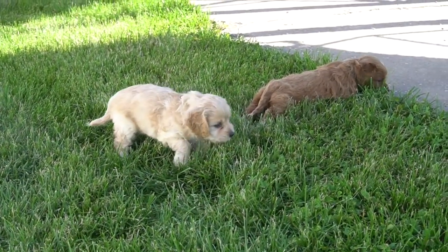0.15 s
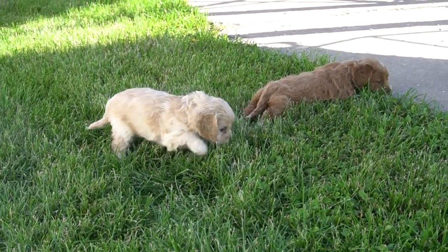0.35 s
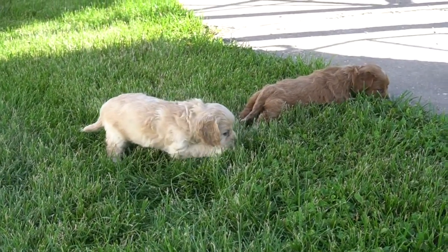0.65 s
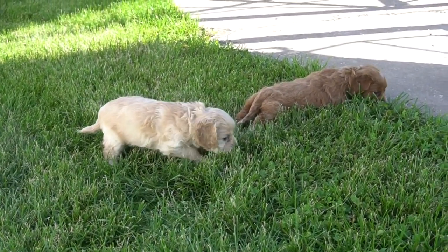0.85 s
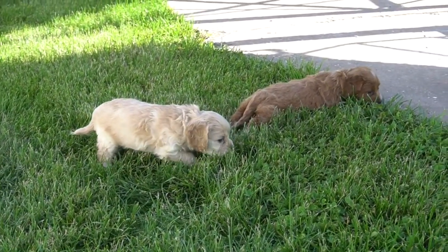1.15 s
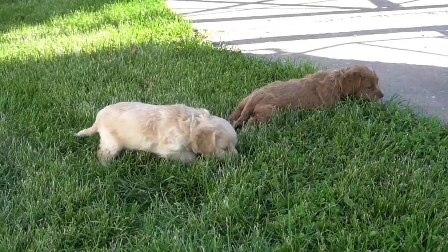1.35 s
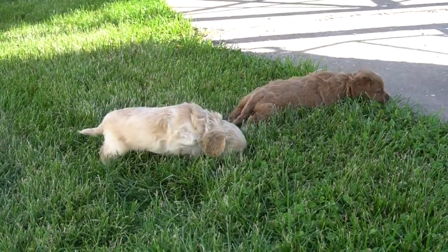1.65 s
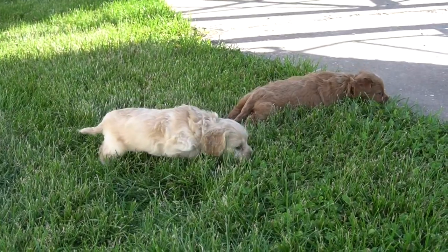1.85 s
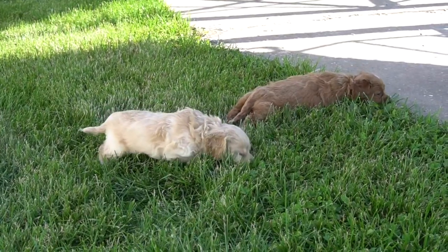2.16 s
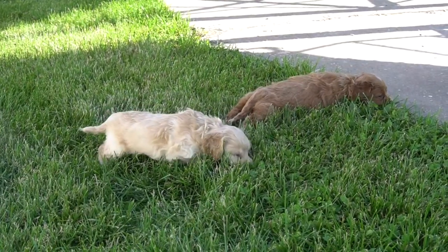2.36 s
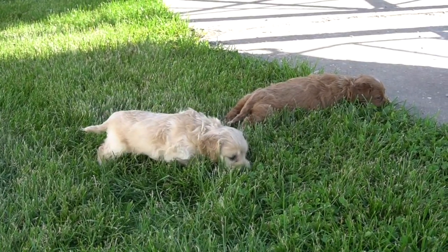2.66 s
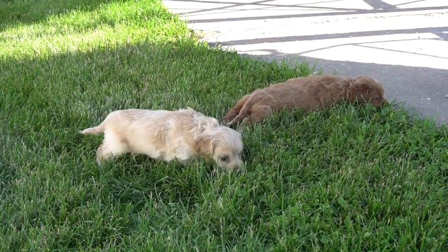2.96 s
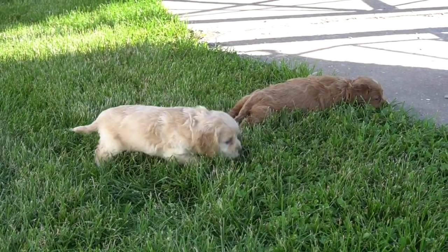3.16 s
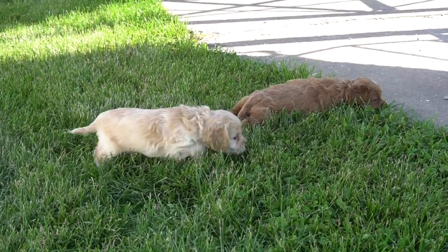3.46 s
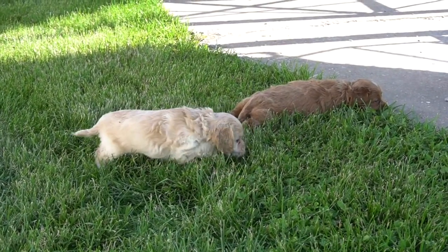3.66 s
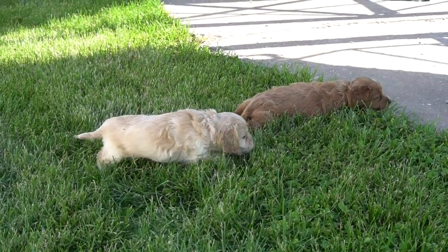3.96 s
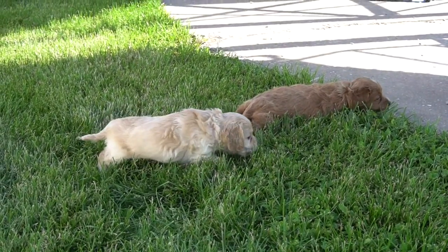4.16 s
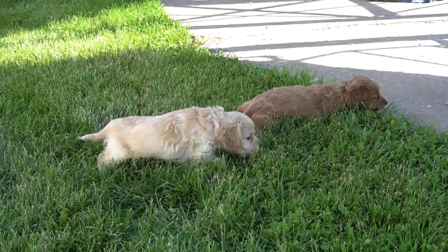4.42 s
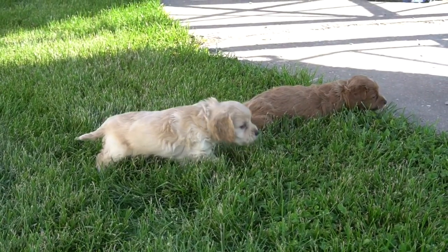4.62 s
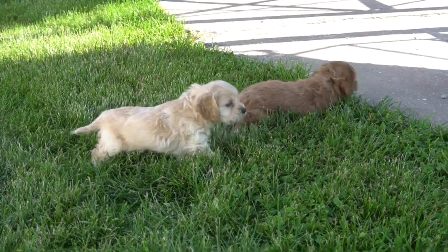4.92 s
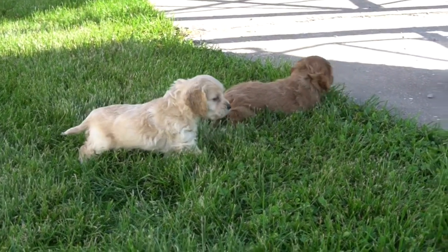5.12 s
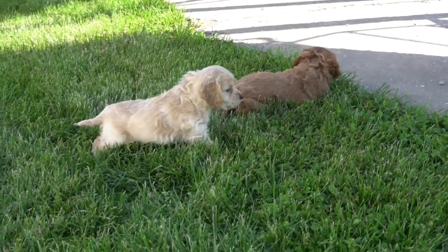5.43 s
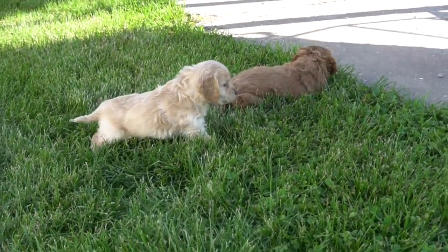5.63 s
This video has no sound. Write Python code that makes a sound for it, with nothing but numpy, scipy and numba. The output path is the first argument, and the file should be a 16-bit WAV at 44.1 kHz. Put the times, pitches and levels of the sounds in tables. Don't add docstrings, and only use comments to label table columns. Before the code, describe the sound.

A breezy garden lawn in stereo, about six seconds. Low wind buffets hit the microphone at once, ease around 0.5 s, then return as heavy, fluttering thumps from 1.2 to 3 s; afterwards it is calm but for a small puff at 5.6 s. A sparrow at left gives quick three-note chirrups at 0.23, 3.27 and 4.8 s: a raspy upward flick, then two arched, falling notes, the last loudest, with tight reflections and a wall echo. A high bird slides downward around 0.5 s. From 1 s nestlings beg in hoarse, slightly sagging high calls of a quarter second or so, frequent until 3.7 s, then sparser, with a long one at 5.4 s. Thin whistles and a hazy chorus come from further off. Small dry stalks snap at 0.9, 1.4 and 5.3 s. Faint traffic and a low hum continue throughout.

```python
import sys
import numpy as np
from scipy import signal
from scipy.io import wavfile
from scipy.ndimage import uniform_filter1d
from numba import njit

SR = 44100
rng = np.random.default_rng(int(sys.argv[2]) if len(sys.argv) > 2 else 0)


def natural_amplitude(level_db):
    exponent = np.asarray(level_db, float) / 20
    return 10 ** exponent


def log_audio(samples):
    frames = np.atleast_2d(samples).T
    limited = np.clip(frames, -1, 1)
    pcm = np.round(limited * 32767).astype(np.int16)
    wavfile.write(sys.argv[1], SR, pcm)


N = 255206
T = np.arange(N) / SR


def level(x, db):
    return x * natural_amplitude(db) / np.sqrt(np.mean(x ** 2))


def band(x, lo_hz, hi_hz):
    sos = signal.butter(2, [lo_hz, min(hi_hz, 0.45 * SR)], "bandpass", fs=SR, output="sos")
    return signal.sosfilt(sos, x)


def walk(rate, size=N):
    hold = max(int(SR / rate), 1)
    held = rng.standard_normal(256)[np.arange(size) // hold % 256]
    return 1.5 * uniform_filter1d(uniform_filter1d(held, hold), hold)


def add(out, s, x):
    i = int(s * SR)
    out[..., i:i + x.shape[-1]] += x[..., :N - i]


def sides(pan_db):
    return natural_amplitude(np.array([pan_db, -pan_db]) / 2)


def syrinx(hz, partials_db):
    phase = 2 * np.pi * np.cumsum(hz) / SR
    voice = 0
    for k, db in enumerate(partials_db, 1):
        voice = voice + natural_amplitude(db) * np.sin(k * phase) * (k * hz < 0.4 * SR)
    return voice


def garden(x, t60, left_db, right_db):
    t = T[:SR]
    haze = rng.standard_normal((2, SR)) * 1000 ** (-t / t60) * np.minimum(t / 0.0081, 1)
    haze /= np.sqrt(np.sum(haze ** 2, axis=1, keepdims=True))
    wet = signal.fftconvolve(np.atleast_2d(x) * np.ones((2, 1)), haze, axes=1)[:, :N]
    return natural_amplitude(np.array([[left_db], [right_db]])) * wet


# pitch_hz [Hz], level_db [dB per Hz]
TOWN_SPECTRUM = [(25, 1), (59, -2), (140, -4.5), (193, -8.5), (247, -2.5), (390, -12), (450, -12),
                 (650, -16.5), (1200, -18), (2240, -21.5), (4600, -20.5), (6600, -35.5), (12200, -37),
                 (15600, -41.5)]
# pitch_hz [Hz], left-right likeness [0-1]
COHERENCE = [(60, 1), (130, 1), (290, 1), (640, 0.78), (1410, 0.44), (3100, 0.59), (6820, 0.34),
             (15000, 0.2)]
# start_s [s], level_db [dB around 1 kHz]
TRAFFIC_SWELL = [(0.0, -51.5), (0.39, -55), (1.31, -51.5), (1.47, -56.5), (2.13, -56.5), (2.43, -52),
                 (3.47, -54), (4.04, -52.5), (4.58, -51.5), (5.0, -54), (5.79, -50.5)]
# pitch_hz [Hz], width_hz [Hz], level_db [dB]
HUM_BANDS = [(145, 15.6, -47), (235.7, 15.3, -55.5)]


def town():
    start_s, traffic_db = np.transpose(TRAFFIC_SWELL)
    swell_db = np.interp(T, start_s, traffic_db - np.mean(traffic_db))
    town_hz, town_db = np.transpose(TOWN_SPECTRUM)
    like_hz, likeness = np.transpose(COHERENCE)
    out = 0
    for hz in 25 * 2 ** np.arange(0, 9.4, 1 / 3):
        like = np.interp(np.log(hz), np.log(like_hz), likeness)
        mid, side = band(rng.standard_normal((2, N)), hz / 1.152, hz * 1.105)
        db = np.interp(np.log(hz), np.log(town_hz), town_db)
        db = db + swell_db * min(hz / 500, 1) + 2.3 * walk(5.5)
        pair = np.sqrt(1 + like) * mid + np.sqrt(1 - like) * side * np.array([[1], [-1]])
        out = out + natural_amplitude(db) * pair
    hum = np.zeros(N)
    for hz, width_hz, db in HUM_BANDS:
        hum += level(band(rng.standard_normal(N), hz - width_hz / 2, hz + width_hz / 2), db)
    return level(out, -42) + hum


# [dB, upper minus lower eddies]
GUST_PEAKS = [(0.0, -31.5, 1.4, -14.5), (0.089, -12.5, 0.05, -9.5), (0.238, -15.5, .16, -9),
              (0.45, -28, -0.5, -31), (0.55, -34, 0.5, -24), (0.70, -27.5, 0.4, -17.5),
              (0.80, -28.5, -1, -25), (0.98, -27.5, 0.4, -12), (1.18, -14.5, 0.03, -4),
              (1.451, -13.5, 0.28, -5), (1.509, -12, 0.02, -21), (1.618, -15.5, .08, -2.5),
              (1.683, -12, 0.0477, -0.5), (1.741, -23.5, -0.63, -8), (1.893, -14.5, 0.19, -8.5),
              (2.031, -18, 0.22, -6), (2.242, -15, 0.22, -14.5), (2.31, -18, 0.13, -20),
              (2.379, -21.5, 0.44, -7), (2.48, -20, 0.39, -27), (2.849, -21.5, 0.24, -8),
              (2.908, -18.5, 0.2134, -5.5), (4.054, -29, 0.11, -32), (4.51, -34, 0.15, -30),
              (5.598, -22.5, 0.26, -16), (5.78, -32, 1.1, -28)]


def gust_strengths():
    peak_s, peak_db, dying_s, sharp_db = np.transpose(GUST_PEAKS)
    rise_share, lull_db = 0.8, -62
    core_share = 0.36
    t = T[::100, None]
    lower = (peak_db, dying_s)
    upper = (peak_db + sharp_db + 4.0, core_share * dying_s)
    strengths = []
    for top_db, fall_s in (lower, upper):
        drop = np.maximum((t - peak_s) / fall_s, (peak_s - t) / (rise_share * fall_s))
        db = np.maximum((top_db - 20 * drop).max(axis=1), lull_db)
        strengths.append(natural_amplitude(np.interp(T, t[:, 0], db)))
    return strengths


def eddy(hz, turns):
    u = np.linspace(0, 1, int(turns * SR / hz))
    return np.sin(np.pi * u ** 0.55) ** 2 * np.sin(2 * np.pi * turns * u ** 0.86)


# pitch_hz [Hz], level_db [dB]
EDDY_SIZES = [(40, -10.5), (60, -2.5), (90, 1.5), (130, -2.5), (200, 5.5), (290, 0.5), (420, -11),
              (600, -21.5), (850, -40)]
# start_s [s], level_db [dB peak], pitch_hz [Hz]
SINGLE_EDDIES = [(0.068, -18, 150), (0.2, -23, 126), (0.215, -12.5, 122), (0.421, -44, 132),
                 (0.869, -27.5, 197), (0.975, -25, 130), (1.168, -18, 143), (1.385, -34, 145.8),
                 (1.426, -17, 138), (1.463, -12, 330), (1.558, -25, 133), (1.602, -12.5, 128),
                 (1.677, -18.5, 230), (1.715, -11, 155), (1.873, -21, 119.5), (1.906, -15.5, 118.4),
                 (1.984, -19, 186.7), (2.228, -32, 120), (2.258, -41, 121), (2.297, -19, 121),
                 (2.344, -33, 129), (2.367, -27, 145), (2.476, -37, 121), (2.826, -30, 125.4),
                 (2.848, -23, 120), (2.877, -10.5, 203), (2.915, -14.5, 154), (5.568, -23.5, 123)]


def wind():
    lower, upper = gust_strengths()
    out = np.zeros((3, N))
    for hz, db in EDDY_SIZES:
        arrive = rng.random((3, N)) < 0.8 * hz / SR
        size = rng.standard_normal((3, N)) * arrive
        swirls = signal.fftconvolve(size, eddy(hz, turns=2.84)[None], axes=1)[:, :N]
        out += level(swirls, db - 6.5) * (upper if hz > 170 else lower)
    for s, db, hz in SINGLE_EDDIES:
        add(out[0], s - 0.003, natural_amplitude(db + 4.5) * eddy(hz, turns=1.34))
    shared, own = out[0], out[1:]
    port_hz = 268
    turn = (1 - np.pi * port_hz / SR) / (1 + np.pi * port_hz / SR)
    right = signal.lfilter([-turn, 1], [1, -turn], shared)
    return np.array([shared, right]) + natural_amplitude(-8.5) * own


# start_s [s], level_db [dB]
CHORUS_SWELL = [(0.0, -49), (0.35, -45), (0.95, -65), (1.16, -50.5), (1.87, -57), (2.3, -53.5),
                (2.77, -51.5), (2.98, -84), (3.29, -59), (3.43, -37), (3.72, -65.5), (4.06, -48.5),
                (4.42, -60), (4.978, -40), (5.14, -57), (5.79, -50.5)]


def chorus():
    out = np.zeros((2, N))
    for when, low, slide, size, pan, long in rng.random((500, 6)):
        u = np.linspace(0, 1, int((0.0415 + 0.12 * long) * SR))
        bend = 0.35 * (slide - 0.7) * u + 0.0267 * walk(200.3, size=len(u))
        hz = (2500 + 3000 * low) * (1 + bend)
        call = np.sin(np.pi * u) * syrinx(hz, [0, -22])
        add(out, when * T[-1], natural_amplitude(10 * size) * sides(12 * (pan - 0.5))[:, None] * call)
    start_s, db = np.transpose(CHORUS_SWELL)
    return level(garden(out, 0.33, -0.6, -0.6), 5.9) * natural_amplitude(np.interp(T, start_s, db))


# start_s [s], length_s [s], end_hz [Hz], level_db [dB]
HIGH_SLIDES = [
    (0.49, 0.17, 5340, -39),
    (0.531, 0.18, 5220, -43),
    (.575, 0.19, 5130, -46.5),
    (0.651, 0.13, 6050, -47),
]
# start_s [s], length_s [s], start_hz [Hz], end_hz [Hz], level_db [dB]
HEDGE_WHISTLES = [(0.503, 0.12, 2177, 2170, -55), (.55, 0.067, 4210, 4460, -47),
                  (.62, 0.083, 3790, 3430, -48.5), (0.711, 0.082, 2634, 2190, -48),
                  (0.923, 0.045, 2220, 2580, -48), (0.961, 0.098, 3115, 2780, -42),
                  (1.271, 0.054, 3140, 3120, -48.5), (1.403, 0.038, 3220, 2950, -44),
                  (2.589, 0.056, 3330, 2890, -39), (2.804, 0.1, 3558, 2896, -44),
                  (3.786, 0.23, 3375, 3180, -50), (4.049, 0.07, 3220, 2920, -39.5),
                  (4.182, 0.11, 3640, 2910, -45.5), (4.52, 0.2, 2550, 2383, -53),
                  (5.056, 0.075, 3350, 3300, -53), (5.332, 0.055, 3140, 3070, -46)]
# start_s [s], length_s [s], start_hz [Hz], end_hz [Hz], level_db [dB]
TREE_WHISTLES = [(.92, 0.061, 4040, 4100, -45), (1.146, 0.036, 3880, 2920, -44),
                 (2.25, 0.14, 3290, 2770, -51), (2.38, 0.047, 5680, 4320, -40.5),
                 (3.172, 0.05, 5690, 4460, -43), (4.07, 0.091, 4220, 4150, -43),
                 (4.239, 0.057, 6200, 5970, -47.5), (4.34, 0.11, 5120, 5060, -48.5),
                 (4.597, 0.092, 5560, 8100, -62), (4.982, 0.069, 6250, 6050, -52.5),
                 (5.22, 0.034, 5440, 5430, -46), (5.385, 0.052, 5900, 5800, -52.5),
                 (5.413, 0.099, 5620, 4245, -46), (5.555, 0.11, 2850, 3580, -45),
                 (5.66, 0.088, 5950, 6190, -44.5)]


def whistles():
    out = np.zeros((2, N))
    high = [(s, length, 8470, end_hz, db) for s, length, end_hz, db in HIGH_SLIDES]
    # calls, pan dB, unsteadiness
    groups = ((high, -5, 0.54), (HEDGE_WHISTLES, -6, 0.84), (TREE_WHISTLES, 2.5, 0.84))
    for calls, pan_db, unsteady in groups:
        for s, length, hz0, hz1, db in calls:
            u = np.linspace(0, 1, int(length * SR))
            slide = np.clip((u - 0.12) / 0.8, 0, 1)
            hz = hz0 + (hz1 - hz0) * slide ** 2 * (3 - 2 * slide)
            hz = hz * (1 + 0.0152 * unsteady * walk(245, size=len(u)))
            flutter = natural_amplitude(db + 3.9 * unsteady * walk(88.4, size=len(u)))
            call = flutter * np.sin(np.pi * u) ** 0.41 * syrinx(hz, [0, -30])
            add(out, s, sides(pan_db)[:, None] * call)
    return natural_amplitude(-2.0) * out + garden(out, 0.28, 0.55, -1.6)


# start_s [s], level_db [dB], low_hz [Hz], high_hz [Hz], length_ms [ms]
STALK_SNAPS = [
    (.887, -29, 2000, 3800, 2.5),
    (1.390, -38, 1400, 2500, 8),
    (5.298, -40, 8500, 15000, 12),
    (5.303, -38, 1200, 3000, 5.5),
    (5.316, -35, 1200, 2800, 3.5),
    (5.318, -35, 7000, 15000, 6.5),
]


def grass():
    out = np.zeros(N)
    for s, db, lo_hz, hi_hz, ms in STALK_SNAPS:
        burst = rng.standard_normal(2000) * np.exp(-T[:2000] * 1000 / ms)
        burst = band(burst, lo_hz, hi_hz)
        add(out, s, natural_amplitude(db) * burst / np.abs(burst).max())
    return out


# start_s [s], length_s [s], level_db [dB peak], start_hz [Hz], end_hz [Hz]
BRIGHT_NEST = [
    (1.022, 0.26, -37.5, 4520, 4300),
    (1.301, .2, -31.5, 4648, 4507),
    (1.755, 0.33, -36.5, 4525, 4100),
    (2.061, .31, -34.5, 4586, 4237),
    (2.377, 0.23, -48, 4760, 4230),
    (2.599, 0.33, -32.5, 4542, 4267),
    (2.943, 0.28, -37.5, 4673, 4130),
    (3.747, 0.26, -37.5, 4510, 4103),
    (5.018, 0.32, -39, 4254, 4750),
    (5.398, 0.62, -43, 4740, 4097),
]
# start_s [s], length_s [s], level_db [dB peak], start_hz [Hz], end_hz [Hz]
DULL_NEST = [
    (3.17, 0.12, -42.5, 4830, 4700),
    (3.47, 0.26, -39, 4600, 4100),
    (4.33, .25, -46.5, 4950, 4650),
    (4.66, .14, -35.5, 5100, 4100),
]
# pitch ratio [1], hoarseness [1], level_db [dB], octave lift [dB]
NEST_VOICES = [
    (0.881, 0.089, -3.5, -4.5),
    (0.979, 0.0141, 4, -4.5),
    (1.03, 0.03525, 1.5, 3),
    (1.152, 0.04, -7.5, -5),
]


def nestlings():
    out = np.zeros((2, N))
    for calls, octave_db in ((BRIGHT_NEST, -12), (DULL_NEST, -18.5)):
        for s, length, peak_db, hz0, hz1 in calls:
            t = T[:int(length * SR)]
            u = t / length
            db = peak_db - np.interp(u, [0, 0.28, 1], [4.5, 0, 8.5])
            hz = (hz0 + (hz1 - hz0) * u) * (1 + 0.11 * np.exp(-t / 0.038))
            edge = np.minimum(np.minimum(t, length - t) / 0.005, 1)
            pan = sides(-2.5 + 2 * u)
            for ratio, hoarse, voice_db, lift_db in NEST_VOICES:
                waver = 1 + hoarse * walk(300, size=len(t)) + 0.014 * walk(25, size=len(t))
                grain_db = 3.0 * walk(67.2, size=len(t))
                second_db = octave_db + lift_db
                voice = syrinx(hz * ratio * waver, [0, second_db, second_db - 11.5])
                add(out, s, edge * natural_amplitude(db + voice_db + grain_db) * pan * voice)
    return natural_amplitude(-10) * out + garden(out, 0.31, -6.5, -6.5)


# start_s [s], length_s [s], start_hz [Hz], end_hz [Hz], level_db [dB]
GRACE_NOTES = [
    (0.229, 0.049, 2036, 3420, -15),
    (3.266, 0.045, 2010, 3400, -9),
    (4.795, .040, 1990, 3360, -8),
]
GRACE_OVERTONES = [-5, 2.5, -9, -3, 0, -21, -19]


def grace_notes():
    song = np.zeros(N)
    for s, length, hz0, hz1, db in GRACE_NOTES:
        u = np.linspace(0, 1, int(length * SR))
        edge = np.minimum(u / 0.093, 1) * np.minimum((1 - u) / 0.14, 1)
        swell = natural_amplitude(db - 17.9 * (1.5 - u)) * edge
        hz = (hz0 + (hz1 - hz0) * u ** 2.4) * (1 + 0.0072 * walk(900, size=len(u)))
        rasp = natural_amplitude(-9) * band(rng.standard_normal(len(u)), 3700, 13800)
        voice = syrinx(hz, GRACE_OVERTONES)
        throat = band(voice + natural_amplitude(9.0) * rasp, 4330, 6660)
        add(song, s, swell * (throat + natural_amplitude(-10) * voice + rasp))
    return song


# start_s [s], length_s [s], top_hz [Hz], end_hz [Hz], level_db [dB]
ARCH_NOTES = [
    (.271, 0.056, 4830, 2830, -14),
    (0.331, 0.049, 3970, 2120, -15.5),
    (3.304, 0.054, 4830, 2767, -8.5),
    (3.362, 0.049, 3785, 2130, -8.5),
    (4.833, 0.062, 4660, 2806, -6),
    (4.892, 0.054, 3923, 2120, -7.5),
]
ARCH_OVERTONES = [0, -40, -38, -50]


def arches():
    song = np.zeros(N)
    start_hz, crest_s = 2930, 0.0179
    for s, length, top_hz, hz1, db in ARCH_NOTES:
        u = np.linspace(0, 1, int(length * SR))
        crest = crest_s / length
        up = start_hz + (top_hz - start_hz) * np.sin(np.pi / 2 * np.minimum(u / crest, 1))
        hz = up + (hz1 - top_hz) * np.clip((u - crest) / (1 - crest), 0, 1) ** 1.08
        hz *= 1 + 0.0092 * walk(404, size=len(u))
        swell = np.minimum(u / 0.19, 1) * np.minimum((1 - u) / 0.085, 1)
        swell *= natural_amplitude(db - 0.018 * np.maximum(2950 - hz, 0) - 0.002 * np.maximum(4000 - hz, 0))
        rasp = natural_amplitude(-25.5 - 8 * u) * band(rng.standard_normal(len(u)), 5600, 13000)
        add(song, s, swell * (syrinx(hz, ARCH_OVERTONES) + rasp))
    return song


# delay_ms [ms], level_db [dB]
PERCH_BOUNCES = [
    [(1.1, -1.5), (2.1, 5), (4.1, 0)],
    [(1.4, -42), (2.6, -3.5), (4.6, -63)],
    [(1.5, -21), (2.8, -7), (5.6, -25)],
]


def sparrow():
    song = grace_notes() + arches()
    near = song.copy()
    for (s, *_), bounces in zip(GRACE_NOTES, PERCH_BOUNCES):
        chirrup = song[int(s * SR):int((s + 0.25) * SR)]
        for ms, db in bounces:
            add(near, s + ms / 1000, natural_amplitude(db) * chirrup)
    wall = np.roll(band(near, 1800, 4700), int(0.064 * SR)) * natural_amplitude(np.array([[-22], [-23]]))
    lag = 2
    direct = np.array([near, np.roll(near, lag)]) * natural_amplitude(np.array([[-1.5], [-15]]))
    direct[1] += natural_amplitude(-12.5) * np.roll(band(near, 6500, 18000), lag)
    return direct + wall + garden(near, 0.14, -8.0, -11.5) + garden(near, 1.0, -28.5, -24)


def scene():
    return town() + wind() + chorus() + whistles() + grass() + nestlings() + sparrow()


@njit
def follow(x, attack, release):
    out, e = np.empty(len(x)), 0.
    for i in range(len(x)):
        e += (x[i] - e) * (attack if x[i] > e else release)
        out[i] = e
    return out


def band_limit(x):
    return signal.sosfilt(signal.butter(12, 15730, fs=SR, output="sos"), x)


def record(dry):
    attack_s, release_s, threshold_db = 0.0074, 0.08, -14.5
    peak = follow(np.abs(dry).max(axis=0), 1 / (attack_s * SR), 1 / (release_s * SR))
    gain = np.minimum(natural_amplitude(threshold_db) / (peak + 1e-9), 1) ** 0.49
    return band_limit(dry * gain)


dry = scene()
out = record(dry)
log_audio(out)
```